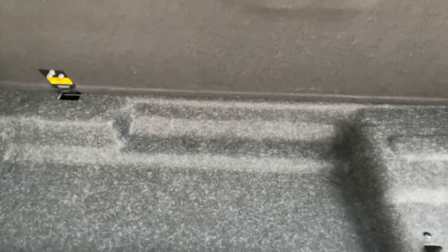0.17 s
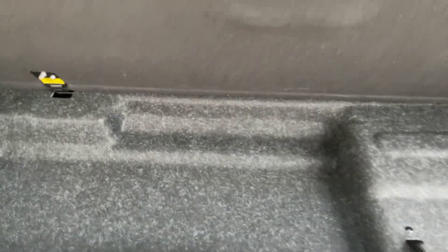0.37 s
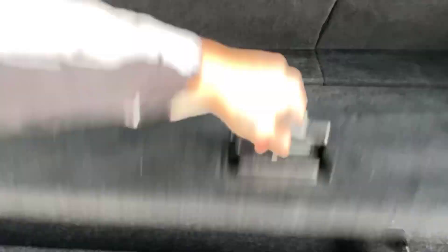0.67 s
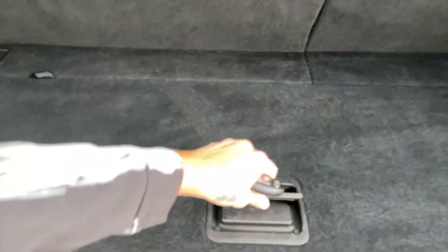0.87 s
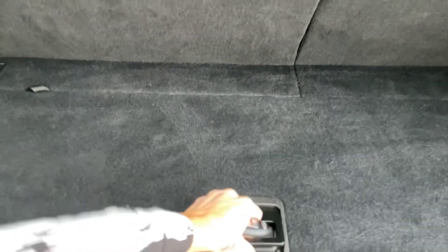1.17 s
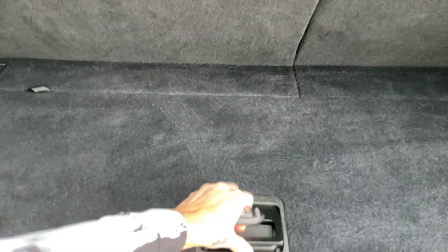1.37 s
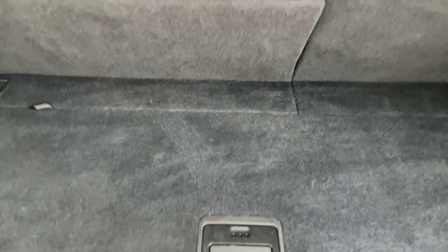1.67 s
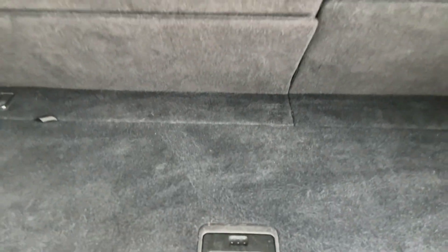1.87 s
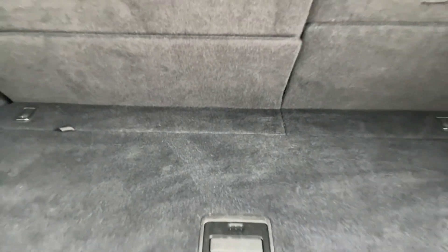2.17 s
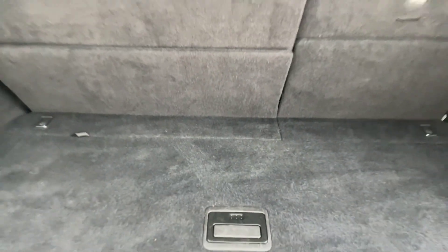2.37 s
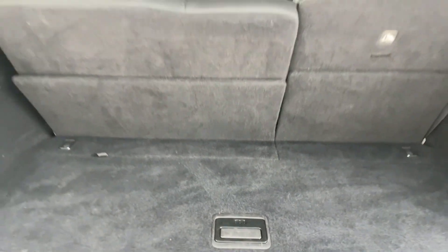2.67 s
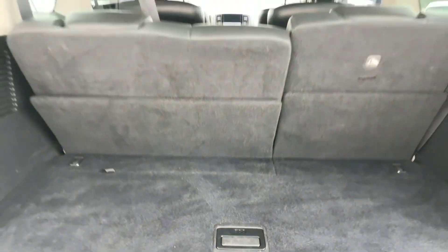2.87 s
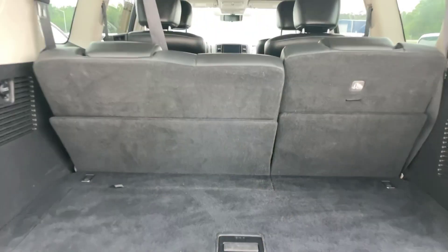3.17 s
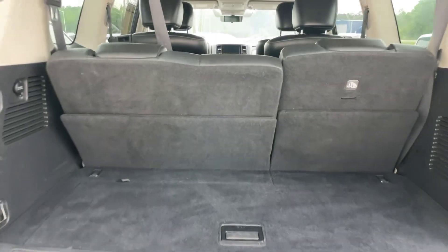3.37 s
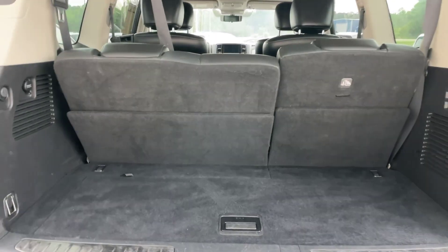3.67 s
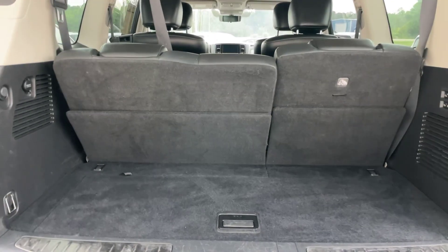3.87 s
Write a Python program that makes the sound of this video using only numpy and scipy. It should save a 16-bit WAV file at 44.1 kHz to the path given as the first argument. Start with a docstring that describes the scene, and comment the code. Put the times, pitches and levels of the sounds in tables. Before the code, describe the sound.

A handheld microphone close to a car's cargo floor picks up a deep electric hum and thin outdoor air noise. A padded lid lands with a fluttering low thud, fingers rub the handle briefly, the lid bumps again, and hard plastic clicks sharply, bouncing into quieter taps. Afterwards only the hum, growing a little stronger and then throbbing, remains over faint traffic, which jumps louder at the very end.

```python
"""A low motor hum near 97 Hz runs throughout, with distant traffic and a faint hiss: an open car boot in a car park.
A hand lowers the carpeted floor lid, presses it home and lets the plastic handle snap back and bounce.
The hum is a wavering tone with overtones and a noise fringe; traffic and hiss are shaped, patchy noise.
Lid and handle are banks of decaying modes struck by timed contacts; a grainy noise rub scuffs the handle."""
import sys
import numpy as np
from scipy import signal
from scipy.fft import rfft, irfft, next_fast_len
from scipy.io import wavfile
from scipy.ndimage import uniform_filter1d, map_coordinates

SR = 44100
rng = np.random.default_rng(int(sys.argv[2]) if len(sys.argv) > 2 else 0)


def to_wav(sig):
    """Store sig (one row per channel, or 1-D mono) as 16-bit WAV at the path in sys.argv[1].

    Samples outside -1..1 are clipped; the rate is SR.
    """
    pcm = np.clip(np.atleast_2d(sig), -1, 1) * 32767
    pcm = np.round(pcm).astype(np.int16)
    wavfile.write(sys.argv[1], SR, pcm.T)  # frames by channels


N = 177193

# Spectra of traffic rumble, engine drone, tyre roar and tyre swish: f/Hz, relative level/dB
RUMBLE_SPECTRUM = [(12, -41), (20, -22), (47, 6), (65, 2.5), (81, -2), (92, 1), (120, -50), (200, -120)]
DRONE_SPECTRUM = [(61, -26), (103, -9.5), (114, -7), (122, -5.5), (124, -25), (129, -12), (199, -19.5),
                  (289, -22), (323, -23.5), (389, -23.5), (468, -27), (500, -27.5), (650, -35),
                  (1100, -120)]
ROAR_SPECTRUM = [(240, -18.5), (400, -8), (466, -4.5), (509, -1.5), (532, -5), (818, 0.5), (1160, 0),
                 (1300, -14.5), (1690, -36), (2860, -120)]
SWISH_SPECTRUM = [(760, -21.5), (1300, -1), (1490, -1), (1910, -3), (2320, -9.5), (3000, -24), (3900, -53),
                  (6600, -120)]
# Rumble, drone, roar and swish in turn: base level at the start/dB, growth/(dB/s), share of a car's swell
ROAD_LAYERS = [(-42, 0.12, 0), (-46, 0.4, 0.5), (-47, 0.49, 0.63), (-49, 0.57, 0.62)]
# Far cars going by: t/s, half length/s, swell before each layer's share/dB
CAR_PASSES = [(1.525, .25, 4.5), (3.013, 0.24, 4.5)]
# Spectra of the dull and the bright hiss: f/Hz, relative level/dB
LOW_HISS_SPECTRUM = [(1530, -23), (2600, -2), (3130, -12), (3620, -9.5), (4020, -7), (5180, -12.5),
                     (5600, -15), (7280, -49), (12300, -120)]
HIGH_HISS_SPECTRUM = [(1760, -13), (3000, -2), (4190, -5.5), (4910, -8), (6440, -2.5), (7940, -2.5),
                      (9650, -7), (12300, -4.5), (15200, -12.5), (15800, -10)]
# Low and high hiss in turn: base level before the turn/dB, after it/dB, drift/(dB/s), share of a car's swell
HISS_LAYERS = [(-51.5, -56.5, -1.14, 0.65), (-60, -53.5, 0.56, 0.2)]
# Base level of the motor hum, before flutter and throb: t/s, level/dB
HUM_LEVEL = [(0, -43.5), (.3, -44), (1.5, -38), (2.0, -38.5), (2.85, -35.5), (3.1, -42), (3.45, -36.5),
             (4.02, -34.5)]
# Air in the boot rumbling along with the motor: f/Hz, relative level/dB
HUM_FRINGE_SPECTRUM = [(88, -33), (93, -6), (97, 14.5), (101, -11), (107, -50)]
# Second and third harmonic of the hum: base level against the tone/dB, growth/(dB/s)
HUM_OVERTONES = [(-39.5, 4.5), (-19.5, -1.5)]
# Spectrum of fingers rubbing the handle: f/Hz, relative level/dB
RUB_SPECTRUM = [(300, -17), (1000, 21), (3000, 9), (8000, -23), (15000, -40)]
# Modes of the lid and the hollow under it, before tilt and scatter: f/Hz, level/dB, t60/s
LID_MODES = [(64.6, -3, 0.17), (92, -3.5, 0.048), (113, -0.5, 0.12), (153.5, -5.5, 0.092), (198, 2, 0.095),
             (227, -3.5, 0.11), (266, -9, 0.077), (291, 1, 0.041), (345, -4.5, 0.052), (505.5, -9, 0.063),
             (546.4, -16.5, 0.13), (675, -12.5, 0.057)]
# Modes of the plastic handle, before scatter: f/Hz, level/dB, t60/s
HANDLE_MODES = [(946, 7.5, 0.041), (1250, -8, 0.11), (1450, -8, 0.082), (1585, -2, 0.062),
                (1950, -16, 0.076), (2626, -2.5, 0.042), (2667, -8.5, 0.081), (3075, 3.5, 0.018),
                (3600, -4, 0.024), (3670, 0.5, 0.028), (4040, -2, 0.029), (4240, -9, 0.044),
                (5930, -6, 0.01)]
# Crack of plastic on plastic: f/Hz, relative level/dB
CRACK_SPECTRUM = [(400, -41), (900, 8.5), (4200, -3.5), (5200, -10.5), (6100, -14), (7000, -31),
                  (9000, -70)]
# Contacts on the lid: t/s, blow level/dB, contact time/ms, tilt to high modes/(dB/octave), snap level/dB
LID_CONTACTS = [(.790, -21.5, 1.93, 5, -64), (.800, -22.5, 2.6, -10.5, -57), (.811, -12.5, 5.1, 16, -49),
                (.822, -13.5, 3.9, -2, -56), (0.831, -24, 1.5, -7.5, -56), (1.118, -47, 0.9, 13.5, -48),
                (1.127, -29, 2.7, 7, -47), (1.154, -14, 4.7, -4.5, -70), (1.158, -23.5, 1.93, 4.5, -65),
                (1.164, -22.5, 3.2, -4.5, -62), (1.3932, -10.5, 0.34, 0.5, -23),
                (1.4192, -17.5, 0.71, 3.5, -34), (1.435, -18.5, 2, 1.5, -51), (1.478, -20.5, 6.8, 0.5, -48)]

# Outdoors
HISS_TURNS_S, HISS_TURN_WIDTH_S = 0.23, 0.064  # the hiss turns from dull to bright
RUMBLE_RISES_S, RUMBLE_RISE_DB = 3, 3  # the deep rumble gets heavier
TREBLE_DIP_S, TREBLE_DIP_HALF_S, TREBLE_DIP_DB = 3.37, 0.2, -2
LOUDER_S, LOUDER_ROAD_DB, LOUDER_HISS_DB = 3.9975, 8, 6  # road and hiss jump up at the very end

# Hum: it starts a little sharp, then settles
EARLY_HZ, HUM_HZ, SETTLES_S, SETTLE_WIDTH_S = 98.5, 96.6, 0.85, 0.1
WAVER_HZ, FLUTTER_DB = 0.6, 3.5  # scale of the random drift in pitch and level
FRINGE = 0.3  # gain of the narrow noise against the tone
THROB_FROM_S, THROB_HZ, THROB_HALF_DEPTH_DB = 3.47, 5.33, 6  # the first crest is at the start

# Scuff and blows
SCUFF_S, SCUFF_DB, SCUFF_RISE_S, SCUFF_FALL_S = 1.12, -40.5, 0.011, 0.019
TICK_DB, TICK_HZ = -1, 2650  # handle ring against the rub, and where it answers most
SCATTER_DB = 1.2  # each blow excites the modes a little differently

MIC_LOW_HZ, TOP_HZ = 27.2, 15830


def amp(db):
    """Turn decibels into gain."""
    return 10 ** (np.asarray(db) / 20)


def unit(x):
    """Scale to an rms of 1."""
    return x / np.sqrt(np.mean(x ** 2) + 1e-20)


def step(s, width_s):
    """A smooth rise from 0 to 1 around s."""
    return 0.5 + 0.5 * np.tanh((np.arange(N) / SR - s) / width_s)


def wobble(rate):
    """A smooth random curve, rate knots a second."""
    knots = rng.standard_normal(int(N * rate / SR) + 4)
    return map_coordinates(knots, [np.arange(N) * rate / SR])


def filtered(x, response):
    """Multiply the spectrum of x by a response of frequency."""
    m = next_fast_len(N + 8192)
    return irfft(rfft(x, m) * response(np.fft.rfftfreq(m, 1 / SR)), m)[..., :N]


def rush(spectrum, patchy_db):
    """Shaped noise of rms 1, with patches of random gain across time and frequency."""
    z = signal.stft(rng.standard_normal(N), nperseg=512)[2]
    field = uniform_filter1d(rng.standard_normal(z.shape), size=6, axis=0)
    field = uniform_filter1d(field, size=12, axis=1)
    patchy = signal.istft(z * amp(patchy_db * unit(field)), nperseg=512)[1][:N]
    f, db = np.transpose(spectrum)

    def colour(hz):
        return amp(np.interp(np.log(hz + 1), np.log(f + 1), db, -120, -120))

    return unit(filtered(patchy, colour))


def ringing(modes, rise_cycles, tilt_db=0):
    """The answer of a body to a sharp tap: neighbouring modes swing oppositely, low ones swell later."""
    t = np.arange(SR // 2) / SR
    out = np.zeros(len(t))
    for k, (hz, db, t60) in enumerate(modes):
        level_db = db + tilt_db * np.log2(hz / 200) + SCATTER_DB * rng.standard_normal()
        decay = amp(level_db - 60 * t / t60)
        rise = 1 - np.exp(-(t * hz / rise_cycles) ** 2)
        out += (-1) ** k * decay * rise * np.sin(2 * np.pi * hz * t)
    return out


def outdoors():
    """Distant engines and tyres grow slowly; all but the rumble swell with far cars, and hiss lies on top."""
    t = np.arange(N) / SR
    swell_db = sum(db / (1 + ((t - s) / half_s) ** 4) for s, half_s, db in CAR_PASSES)
    rumble, drone, roar, swish = (amp(db + grow_db * t + share * swell_db)
                                  for db, grow_db, share in ROAD_LAYERS)
    turn = step(HISS_TURNS_S, HISS_TURN_WIDTH_S)
    low, high = (amp(first_db + (later_db - first_db) * turn + drift_db * t + share * swell_db)
                 for first_db, later_db, drift_db, share in HISS_LAYERS)
    rumble = rumble * amp(RUMBLE_RISE_DB * step(RUMBLE_RISES_S, 0.1))
    dip = np.exp(-((t - TREBLE_DIP_S) / TREBLE_DIP_HALF_S) ** 2)
    high = high * amp(TREBLE_DIP_DB * dip)
    road = rumble * rush(RUMBLE_SPECTRUM, patchy_db=2.0)
    road += drone * rush(DRONE_SPECTRUM, patchy_db=-0.15)
    road += roar * rush(ROAR_SPECTRUM, patchy_db=1.0)
    road += swish * rush(SWISH_SPECTRUM, patchy_db=1.57)
    hiss = low * rush(LOW_HISS_SPECTRUM, patchy_db=0.85)
    hiss += high * rush(HIGH_HISS_SPECTRUM, patchy_db=1.14)
    louder = step(LOUDER_S, 0.001)
    return road * amp(LOUDER_ROAD_DB * louder) + hiss * amp(LOUDER_HISS_DB * louder)


def hum():
    """A wavering motor tone with a narrow noise fringe, both throbbing late, and two fluttering overtones."""
    t = np.arange(N) / SR
    hz = EARLY_HZ + (HUM_HZ - EARLY_HZ) * step(SETTLES_S, SETTLE_WIDTH_S)
    phase = 2 * np.pi * np.cumsum(hz + WAVER_HZ * wobble(10)) / SR
    tone = np.sqrt(2) * amp(FLUTTER_DB * wobble(22.014)) * np.sin(phase)
    fringe = FRINGE * rush(HUM_FRINGE_SPECTRUM, patchy_db=4.5)
    throb = np.cos(2 * np.pi * THROB_HZ * (t - THROB_FROM_S)) - 1
    throb_db = THROB_HALF_DEPTH_DB * (t > THROB_FROM_S) * throb
    upper = np.zeros(N)
    for harmonic, (db, grow_db) in enumerate(HUM_OVERTONES, start=2):
        gain = np.sqrt(2) * amp(db + grow_db * t + 5.5 * wobble(25.2))
        upper += gain * np.sin(harmonic * phase + 1.5 * wobble(25))
    level_db = np.interp(t, *np.transpose(HUM_LEVEL))
    return amp(level_db) * (amp(throb_db) * (tone + fringe) + upper)


def scuff():
    """Fingers on the handle: a short grainy rub rises fast, fades, and rings the plastic."""
    t = np.arange(N) / SR - SCUFF_S
    shape = np.exp(-np.where(t < 0, -t / SCUFF_RISE_S, t / SCUFF_FALL_S))
    grain = shape * amp(SCUFF_DB + 2.1 * wobble(230))
    ring = signal.fftconvolve(rng.standard_normal(N), ringing(HANDLE_MODES, rise_cycles=1.3))[:N]
    ring = unit(filtered(ring, lambda hz: 1 / (1 + ((hz - TICK_HZ) / 200) ** 2)))
    rub = rush(RUB_SPECTRUM, patchy_db=1.5)
    return grain * rub + amp(TICK_DB) * grain * shape * ring


def handle_snap():
    """Plastic hits plastic: the handle modes ring under a noisy click and a short rattle."""
    t = np.arange(SR // 2) / SR
    grit = rush(CRACK_SPECTRUM, patchy_db=0)[:len(t)]
    onset = 1 - np.exp(-(t / 0.00025) ** 2)
    click, rattle = 1.14 * amp(-60 * t / 0.009), 0.42 * amp(-60 * t / 0.13)
    return ringing(HANDLE_MODES, rise_cycles=1.7) + onset * (click + rattle) * grit


def lid():
    """Each contact pushes the lid for its contact time and snaps the handle at its own level."""
    out = np.zeros(N + SR)
    length = SR // 2
    push_ms = np.arange(SR // 50) * 1000 / SR
    for s, blow_db, contact_ms, tilt_db, snap_db in LID_CONTACTS:
        # a longer contact favours the low modes
        push = np.sin(np.pi * np.clip(push_ms / contact_ms, 0, 1)) ** 2
        modes = ringing(LID_MODES, rise_cycles=0.65, tilt_db=tilt_db)
        board = np.convolve(push / push.sum(), modes)[:length]
        start = round(s * SR)
        out[start:start + length] += amp(blow_db) * board + amp(snap_db) * handle_snap()
    return out[:N]


def scene():
    """Background to foreground, summed to one channel."""
    return (outdoors() + hum() + scuff() + lid())[None]


def record(dry):
    """The microphone rolls off the deepest bass, and nothing passes above the band limit."""
    return filtered(dry, lambda hz: (hz < TOP_HZ) * (1j * hz / (MIC_LOW_HZ + 1j * hz)) ** 2)


dry = scene()
out = record(dry)
to_wav(out)
```